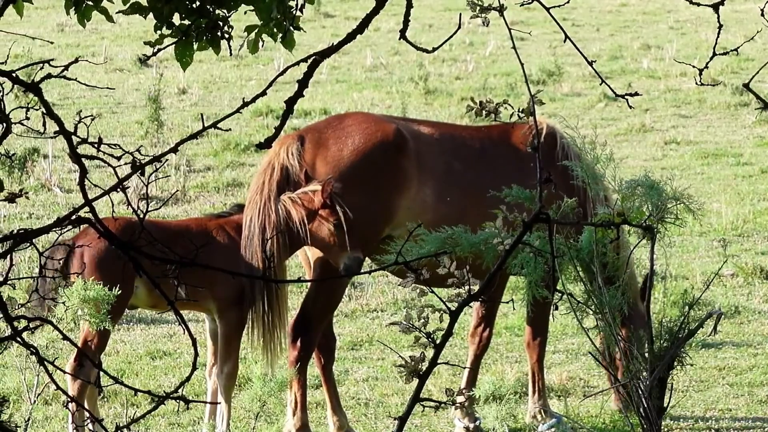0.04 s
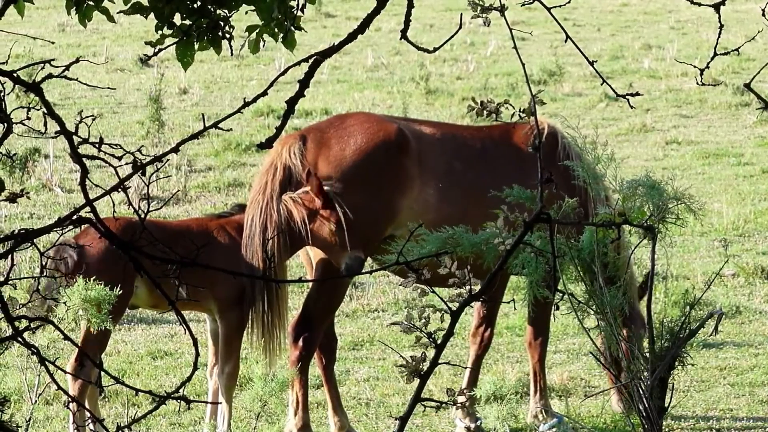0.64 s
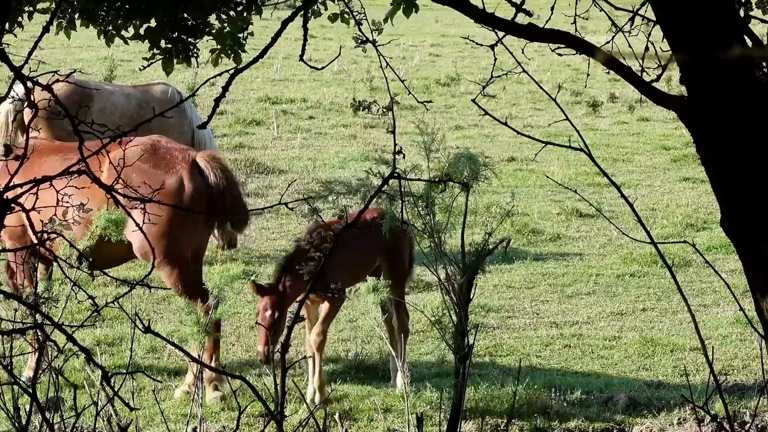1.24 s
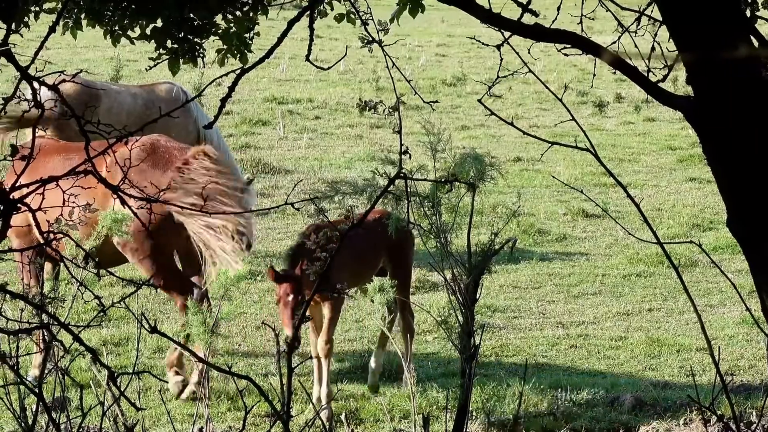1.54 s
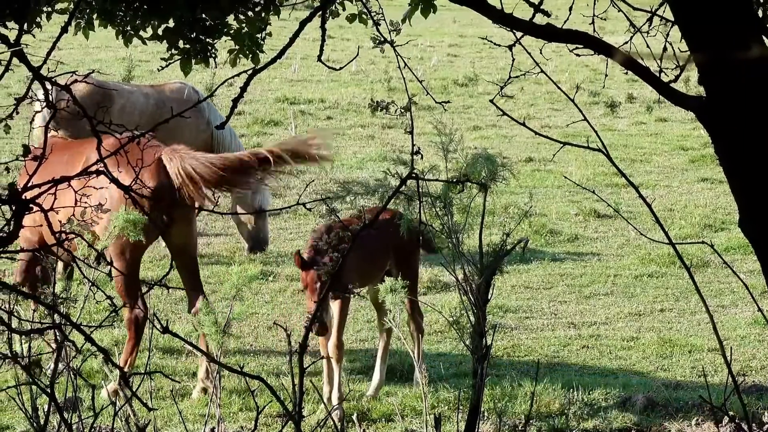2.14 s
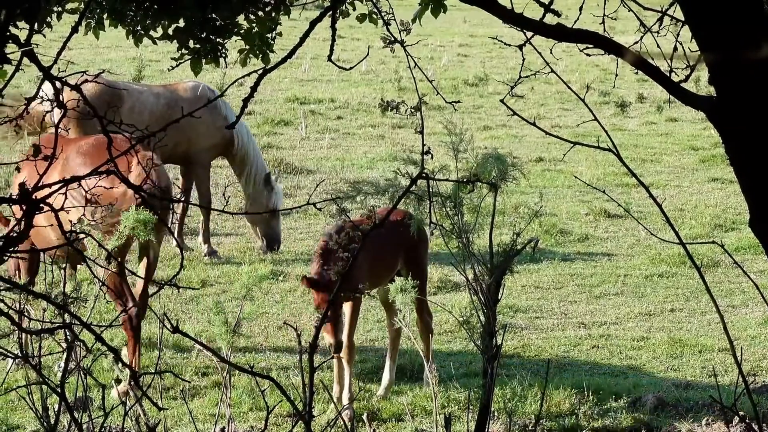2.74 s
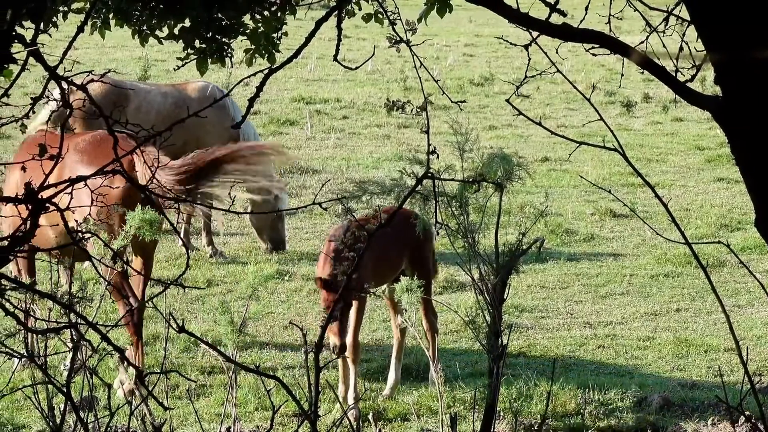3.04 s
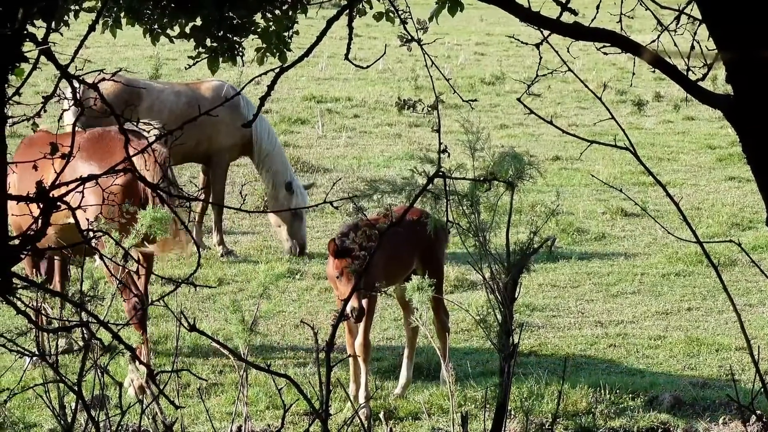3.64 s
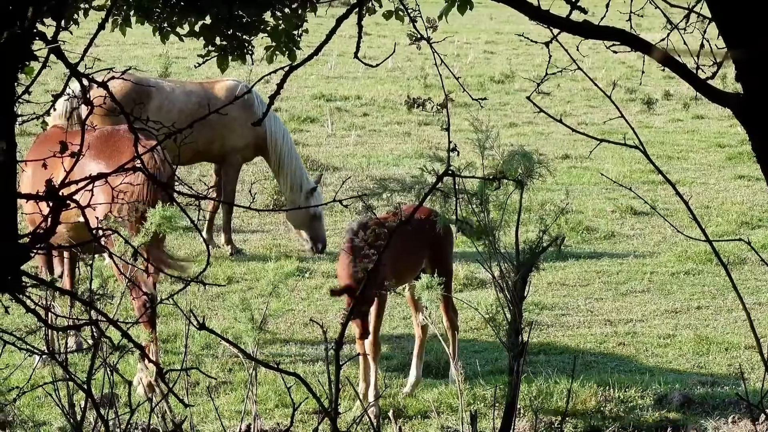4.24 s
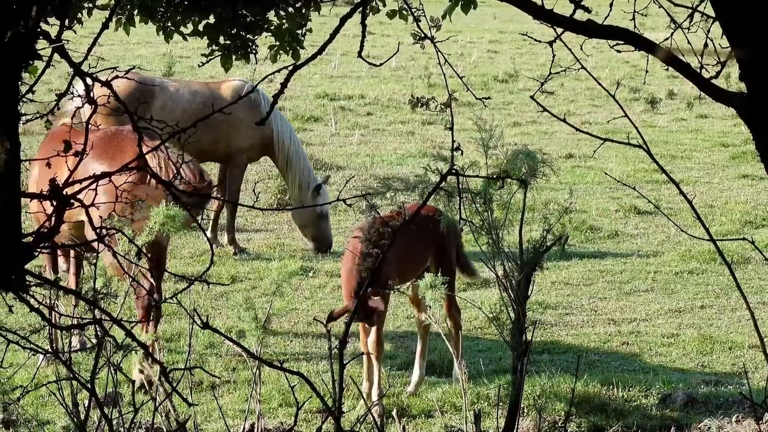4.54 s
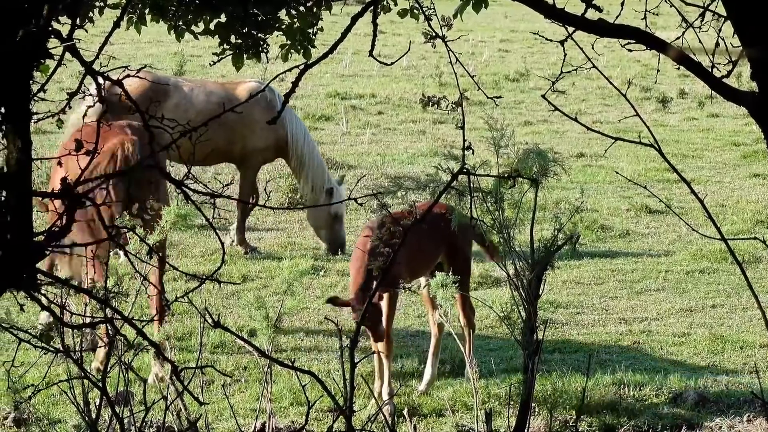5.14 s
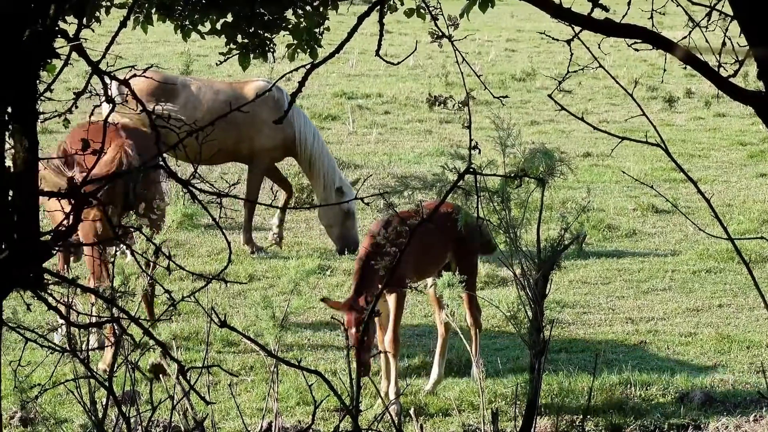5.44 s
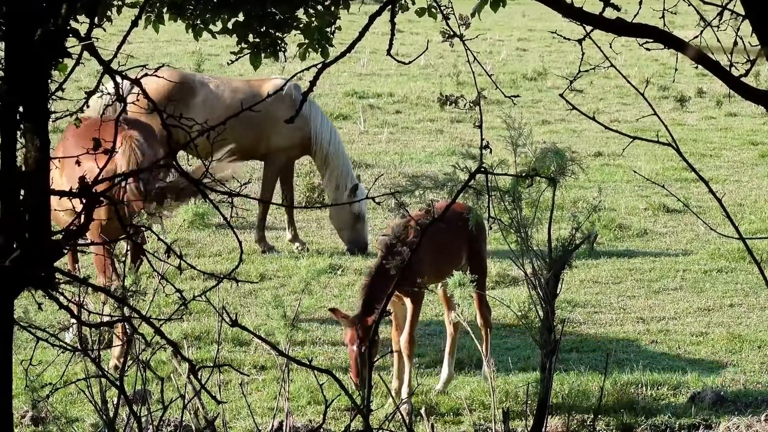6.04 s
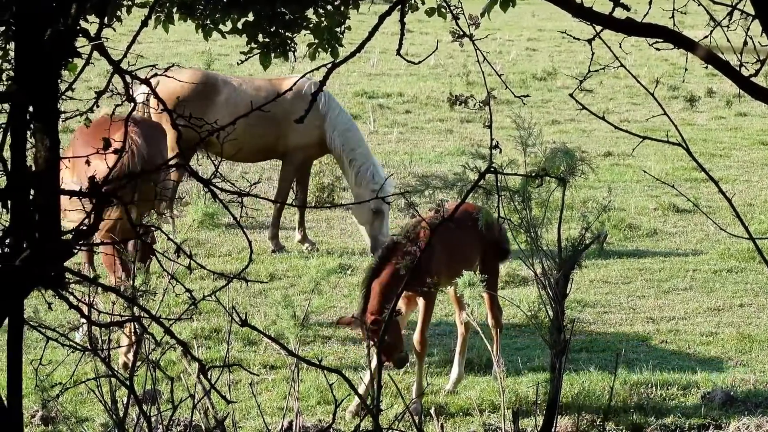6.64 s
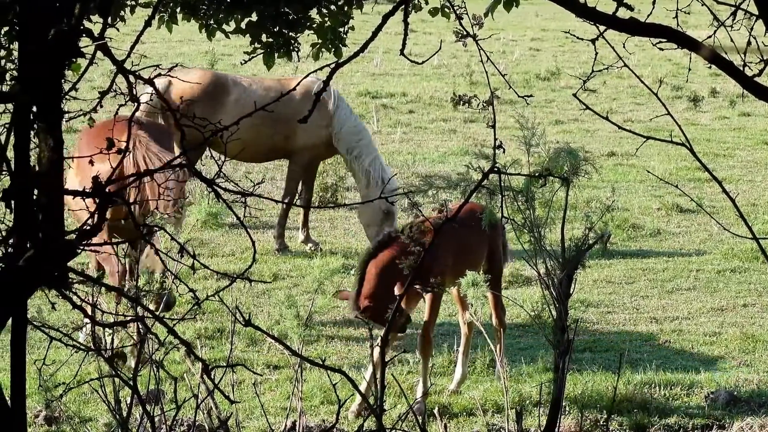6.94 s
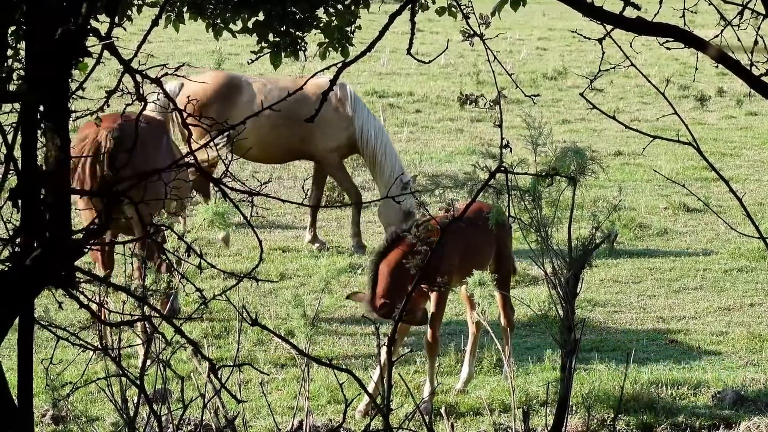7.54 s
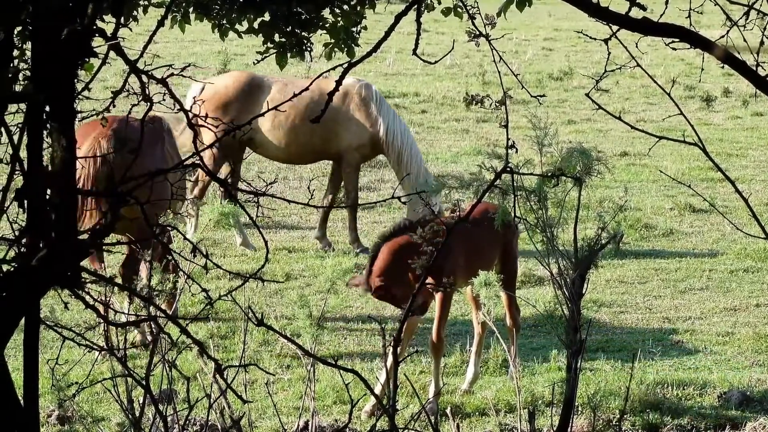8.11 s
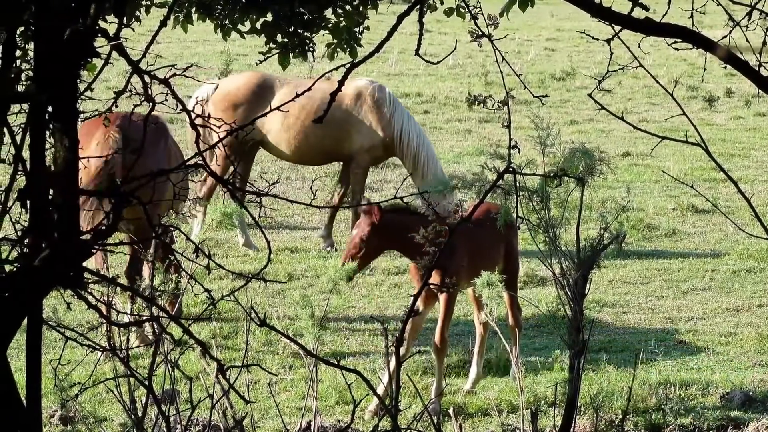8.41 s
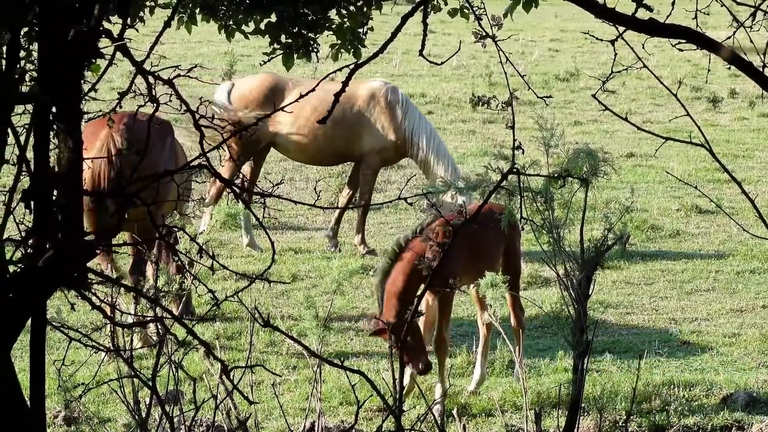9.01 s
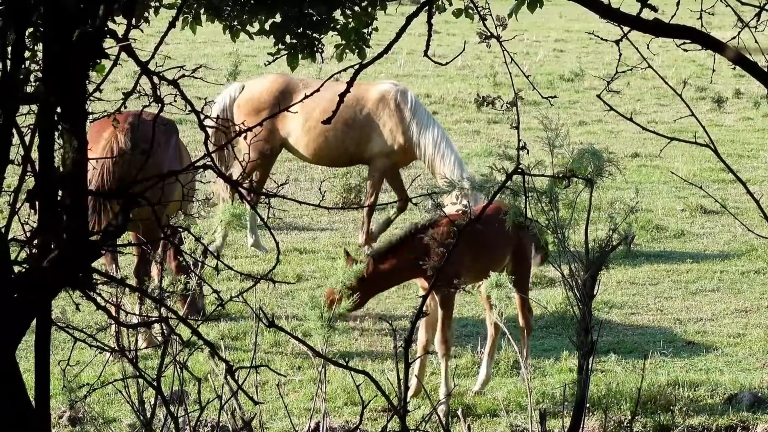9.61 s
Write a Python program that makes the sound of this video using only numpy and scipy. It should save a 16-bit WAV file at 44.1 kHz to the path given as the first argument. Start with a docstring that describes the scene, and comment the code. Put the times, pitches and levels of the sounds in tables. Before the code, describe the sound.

A soft hush of open country runs throughout, heard from under trees beside a meadow. To the left an insect scrapes out four bursts of quick rasping pulses, the last longer and softer. Just as it begins, a dry stick snaps sharply close to the microphone, followed by smaller cracks and a short echo. Grass and leaves rustle now and then, and faraway birds whistle thinly.

```python
"""A meadow, heard from under trees. Open country hushes; grass and leaves rustle now and then. To the left an
insect scrapes its wings in four bouts of about ten rasping strokes a second. A dry stick snaps close by, fibre
after fibre, with smaller cracks around it. Far birds whistle, and a thin ringing near 3 kHz lingers between the
strokes of the first two bouts. A few thin sizzles and dull thuds come and go. Trunks and leaves scatter a short
echo."""
import sys
import numpy as np
from scipy import signal
from scipy.fft import rfft, irfft, next_fast_len
from scipy.io import wavfile
from scipy.ndimage import uniform_filter1d

SR = 44100
rng = np.random.default_rng(int(sys.argv[2]) if len(sys.argv) > 2 else 0)


def transcribe(signal):
    """Save signal, clipped to [-1, 1], as a 16-bit WAV file at the path in sys.argv[1]."""
    frames = np.atleast_2d(signal).T
    limited = np.clip(frames, -1, 1)
    pcm = np.round(limited * 32767).astype(np.int16)
    wavfile.write(sys.argv[1], SR, pcm)


N = 435266


def amp(db):
    return 10 ** (np.asarray(db) / 20)


def unit(x):
    """Scale to rms 1."""
    return x / np.sqrt(np.mean(x ** 2) + 1e-20)


def smooth_noise(count, width_samples):
    """Moving average of white noise, rms 1."""
    return unit(uniform_filter1d(rng.standard_normal(count), width_samples))


def wander(t, slow_hz=0.98, fast_hz=5):
    """Slow random movement, rms 1."""
    rates_hz = np.geomspace(slow_hz, fast_hz, num=24)
    return unit(sum(np.sin(2 * np.pi * (hz * t + rng.random())) for hz in rates_hz))


def drift(curve, t):
    """A (time_s, level_db) curve about its median."""
    db = np.interp(t, *np.transpose(curve))
    return db - np.median(db)


def read(points, hz):
    """Interpolate a table on a log-frequency axis."""
    freq_hz, value = np.transpose(points)
    return np.interp(np.log(hz + 1), np.log(freq_hz + 1), value)


def add(mix, start_s, sound):
    part = mix[max(round(start_s * SR), 0):][:len(sound)]
    part += sound[:len(part)]


def colour(x, spectrum):
    """Filter by a (freq_hz, gain_db) table, keeping the power of white noise."""
    size = next_fast_len(x.shape[-1])
    gain = unit(amp(read(spectrum, np.fft.rfftfreq(size, 1 / SR))))
    return irfft(rfft(x, size) * gain, size)[..., :x.shape[-1]]


def pair(a, b, correlation):
    """Two independent signals to correlated stereo."""
    return np.array([a, correlation * a + np.sqrt(1 - correlation ** 2) * b])


def pan(x, left_db):
    return x * amp([[left_db / 2], [-left_db / 2]])


def trees(x, correlation, rise_s=0.0022, early_s=0.02):
    """Scatter from trunks and leaves: strong early returns, then a diffuse tail."""
    # echo decay: freq_hz, t60_s
    decay = [(300, 0.22), (2000, 1), (4000, 0.67), (8000, 0.55), (15000, 0.43)]
    noise = pair(*rng.standard_normal((2, SR)), correlation)
    hz, t, bins = signal.stft(noise, SR, nperseg=256)
    tail = signal.istft(bins * amp(-60 * t / read(decay, hz)[:, None]), SR, nperseg=256)[1]
    t = np.arange(tail.shape[1]) / SR
    tail *= (1 - np.exp(-t / rise_s)) * (1 + np.exp(-t / early_s))
    return signal.fftconvolve(x[None], tail / np.linalg.norm(tail[0]), axes=1)[:, :N]


def air(level_db=-49.5, patchy_db=2.0, rumble_depth=0.9, rumble_swell_db=1.0, hiss_swell_db=0.3):
    """Hush of open country: a low rumble common to both sides and a wide, drifting hiss."""
    # noise density: freq_hz, relative_db
    spectrum = [(20, -34), (35, -39), (58, -16.5), (85, -2.5), (125, -1), (250, -7), (500, -8), (900, -9.5),
                (1800, -9), (2500, -16), (6000, -22), (10000, -29.5), (15500, -31.5)]
    # spectral humps and dips: centre_hz, width_hz, gain_db
    humps = [(526, 180, -2.5), (618, 88, 4.5), (860, 170, -2), (1203, 130, 3.5), (1376, 140, -2),
             (1820, 1100, 1.5), (2260, 240, -4.5)]
    # left-right likeness: freq_hz, correlation
    likeness = [(60, 0.88), (130, 0.94), (290, 0.19), (640, 0.14), (1400, 0.0186), (3100, 0.057),
                (6800, 0.17), (15000, 0.6)]
    # part of each band that swells with the rumble: freq_hz, share
    rumble_reach = [(150, 0.53), (400, 0.024)]
    # rumble contour, scaled by rumble_depth: time_s, relative_db
    rumble_curve = [(0.0, -63), (1.35, -57.5), (1.67, -58), (1.76, -47), (1.84, -56), (2.33, -52.5),
                    (3.21, -67.5), (3.32, -57), (7.2, -59), (7.39, -65.5), (8.0, -56), (8.33, -63.5),
                    (8.49, -57.5), (9.87, -61.5)]
    # hiss contour: time_s, relative_db
    hiss_curve = [(0, -56), (1.3, -55.5), (3.2, -56.5), (5.8, -55.5), (7.1, -57), (9.45, -56.5),
                  (9.75, -53.5)]
    t = np.arange(N // 512 + 5)[:, None] * 512 / SR
    hz = np.fft.rfftfreq(2048, 1 / SR)
    re_a, im_a, re_b, im_b, patches = rng.standard_normal((len(t), len(hz), 5)).transpose(2, 0, 1)
    patches = unit(uniform_filter1d(uniform_filter1d(patches, size=8, axis=0), size=7, axis=1))
    humps_db = sum(db * np.exp(-(2 * (hz - centre) / width) ** 2) for centre, width, db in humps)
    rumble_db = rumble_depth * drift(rumble_curve, t) + rumble_swell_db * wander(t)
    hiss_db = drift(hiss_curve, t) + hiss_swell_db * wander(t)
    share = read(rumble_reach, hz)
    swell_db = share * rumble_db + (1 - share) * hiss_db
    bins = pair(re_a + 1j * im_a, re_b + 1j * im_b, read(likeness, hz))
    bins *= amp(read(spectrum, hz) + humps_db + swell_db + patchy_db * patches)
    hush = signal.istft(bins.swapaxes(1, 2), nperseg=2048, noverlap=1536)[1][:, :N]
    return amp(level_db) * pan(unit(hush), left_db=0.5)


def rustle(ticks_per_s=4500, spread_db=1.0, clump_db=2.5, stir_db=-68, stir_spread_db=3, echo_db=-6):
    """Blades and leaves brush each other: clumped clouds of tiny, uneven ticks over a faint stir."""
    # rustles: peak_s, level_db, rise_s, decay_s
    swells = [(.11, -52, 0.05, 0.14), (.475, -48.5, .008, .11), (1.11, -41.5, 0.067, 0.061),
              (1.575, -41, 0.029, 0.11), (2.549, -45, 0.036, 0.11), (2.85, -50.5, 0.091, 0.06),
              (3.64, -52, 0.033, 0.047), (4.24, -57, .05, .05), (5.44, -50.5, 0.12, 0.13),
              (5.77, -46.5, 0.047, 0.082), (6.497, -50, 0.019, 0.027), (6.657, -53, 0.031, .042),
              (7.595, -41, 0.035, 0.058), (7.895, -47, .012, 0.099), (9.21, -53, .034, 0.032),
              (9.68, -53.5, 0.03, 0.024)]
    # leaf tick spectrum: freq_hz, gain_db
    spectrum = [(500, -34), (1500, -6.5), (3000, 0), (6000, -0.5), (8000, -2.5), (10500, -6.5),
                (13500, -13), (15500, -12.5)]
    t = np.arange(0, N / SR, 0.002)
    power = amp(2 * (stir_db + stir_spread_db * wander(t)))
    for peak_s, db, rise_s, decay_s in swells:
        falloff = np.where(t < peak_s, (peak_s - t) / rise_s, (t - peak_s) / decay_s)
        power += amp(2 * db) * np.exp(-2 * falloff)
    clumps = unit(amp(clump_db * smooth_noise(len(t), 7)))
    motion = np.interp(np.arange(N) / SR, t, np.sqrt(power) * clumps)
    sizes = amp(spread_db * np.minimum(rng.exponential(1, (2, N)), 4))
    hits = rng.random((2, N)) < ticks_per_s / SR
    ticks = colour(unit(sizes * hits * rng.standard_normal((2, N))) * motion, spectrum)
    return pair(*ticks, correlation=0.48) + amp(echo_db) * trees(ticks[0], correlation=0.52)


def sizzles(echo_db=-7):
    """Brief narrow hisses at the top of hearing."""
    # sizzles: start_s, length_s, level_db
    bursts = [(0.418, 0.15, -60), (2.533, 0.042, -54), (5.753, 0.044, -43), (7.53, 0.12, -48)]
    # sizzle band: freq_hz, gain_db
    spectrum = [(8000, -60), (14600, -35), (15300, -1), (15600, 0), (15900, -7), (17000, -30)]
    hiss = np.zeros(N)
    for start_s, length_s, db in bursts:
        swell = np.hanning(int(length_s * SR))
        add(hiss, start_s, amp(db) * unit(swell * rng.standard_normal(len(swell))))
    hiss = colour(hiss, spectrum)
    return hiss + amp(echo_db) * trees(hiss, correlation=0.6)


def fractures(breaks, ring_s, splinter_s, rise_s=0.00043, waver=0.17, slope_db_per_octave=7.5):
    """Each break rings the wood briefly and throws a spray of noise, strongest near that ring."""
    # splintering spectrum: freq_hz, gain_db
    splinter = [(300, -42), (1300, -15), (2000, -33), (3500, -4.5), (6000, -8), (9000, -5.5), (12000, -7.5),
                (15500, -12.5)]
    t, cracks = np.arange(2048) / SR, np.zeros(N)
    for start_s, db, ring_hz, splinter_db in breaks:
        warp_s = waver * np.cumsum(smooth_noise(len(t), 12)) / SR
        ring = np.sin(2 * np.pi * ring_hz * (t + warp_s)) * np.exp(-t / ring_s)
        spectrum = [(hz, gain_db - slope_db_per_octave * abs(np.log2(hz / ring_hz)))
                    for hz, gain_db in splinter]
        spray = unit(colour(rng.standard_normal(len(t)), spectrum)) * np.exp(-t / splinter_s)
        attack = 1 - np.exp(-t / rise_s)
        add(cracks, start_s, amp(db) * (ring + amp(splinter_db) * spray / np.sqrt(2)) * attack)
    return cracks


def twigs(gain_db=3, echo_db=-3):
    """Small cracks of dry wood, slightly to the right."""
    # cracks: start_s, relative_db, ring_hz, splinter_db
    cracks = [(.464, -40, 3510, 1), (1.047, -32.5, 3800, -4.5), (1.1255, -22.5, 3530, 4.5),
              (1.2895, -18.5, 3300, -6), (1.3712, -16, 6660, -4), (1.4342, -19.5, 4890, -5),
              (1.553, -33.5, 8520, -4), (1.580, -23, 3840, -27), (1.588, -28.5, 4600, -16),
              (1.612, -30, 4170, -19), (1.6757, -27.5, 3830, -21), (2.546, -38.5, 5600, 3.5),
              (5.539, -41.5, 5200, 0.5), (5.761, -40, 6900, -5), (5.767, -36, 6350, -7),
              (6.488, -46, 5960, 4), (7.535, -46, 6100, 4), (7.574, -38, 6000, 2), (7.603, -32.5, 6370, -2),
              (7.6686, -41, 4180, 7), (7.932, -45, 4600, 3), (7.974, -44, 4580, -3)]
    direct = amp(gain_db) * fractures(cracks, ring_s=0.0028, splinter_s=0.004)
    return pan(direct + amp(echo_db) * trees(direct, correlation=0.27), left_db=-6.0)


def strokes(first_gap_s=0.067, sway_depth=0.087, sway_period_s=0.584,
            warm_up_db=-3.5, warm_up_strokes=0.99, tire_db=-2, tire_s=0.2, uneven_db=0.13):
    """Yield (time_s, level_db, softness) per wing stroke; bouts start quick and weak, settle, ease off."""
    # trill bouts: start_s, end_s, gap_growth_s per stroke, settled_gap_s, relative_db, softness (0-1)
    bouts = [(1.034, 2.286, 0.042, .104, -39, 0.26), (2.645, 3.024, 0.0093, .108, -41, 0.1),
             (4.966, 5.79, .0044, .104, -42.8, 0.06), (6.851, 9.42, 0.0044, .1028, -46.5, 0.9)]
    for start_s, end_s, gap_growth_s, settled_gap_s, db, softness in bouts:
        time_s, count = start_s, 0
        while time_s < end_s:
            effort_db = warm_up_db * np.exp(-count / warm_up_strokes)
            effort_db += tire_db * np.exp((time_s - end_s) / tire_s)
            yield time_s, db + effort_db - uneven_db * rng.standard_normal(), softness
            sway = 1 + sway_depth * np.cos(2 * np.pi * (time_s - start_s) / sway_period_s)
            time_s += min(first_gap_s + gap_growth_s * count, settled_gap_s * sway)
            count += 1


def insect(swell_s=0.012, fade_s=0.018, teeth_hz=330, jitter=0.3,
           wing_hz=2460, wing_q=5, wing_db=-8, direct_db=-3.5, echo_db=-8.5):
    """Each wing stroke swells and fades while a scraper trips unevenly over the teeth of a file."""
    # rasp of the near bouts: freq_hz, gain_db
    near_rasp = [(1000, -52), (1500, -10), (1900, -8), (2200, -1.5), (2500, 0), (2930, -1), (3150, -12),
                 (3700, -24), (5500, -20), (9000, -35)]
    # rasp of the last, softer bout: freq_hz, gain_db
    soft_rasp = [(1000, -37), (1350, -12), (1600, -5), (2200, -2.5), (2500, -3.5), (2900, -3),
                 (3150, -15.5), (3600, -8.5), (4400, -23), (9000, -48)]
    t = np.arange(-2700, 2700) / SR
    pressure = np.exp(-0.5 * (t / np.where(t < 0, swell_s, fade_s)) ** 2)
    rasp = np.zeros(N)
    for peak_s, db, softness in strokes():
        rate_hz = teeth_hz * (1 + jitter * smooth_noise(len(t), 150))
        tooth_phase = np.cumsum(rate_hz) / SR % 1
        teeth = unit(np.exp(-tooth_phase) * rng.standard_normal(len(t)))
        scrape = (1 - softness) * colour(teeth, near_rasp) + softness * colour(teeth, soft_rasp)
        ring_hz = wing_hz * (1 + 0.055 * rng.standard_normal())
        # the wing rings most at full pressure
        ring = unit(signal.lfilter(*signal.iirpeak(ring_hz, wing_q, fs=SR), teeth)) * pressure
        add(rasp, peak_s + t[0], amp(db) * pressure * (scrape + amp(wing_db) * ring))
    direct = pan(np.array([np.roll(rasp, 1), rasp]), left_db=6.5)  # sides one sample apart
    return amp(direct_db) * direct + amp(echo_db) * trees(rasp, correlation=0.15)


def snap(push_db=-11, push_s=0.00026, tail_db=15, ring_db=-27, ring_rise_s=0.0024, spread_cycles=0.21):
    """The stick breaks with a push of air; a bright ringing tail follows."""
    # fibres giving way in turn: start_s, level_db, ring_hz, splinter_db
    fibres = [(1.1791, -21, 5650, 4), (1.1815, -7, 3314, 4), (1.1834, -3, 3547, 1),
              (1.1847, -12, 3580, -3.5)]
    # modes that ring on: pitch_hz, relative_db, t60_s
    modes = [(3020, -3, .2), (3170, -6, .4), (3395, 0, .4), (3800, -3.5, 0.32), (4450, 7, 0.39),
             (4580, -21, 0.26), (4600, -13, .25), (5482, 7, 0.2), (5900, 1, .3), (5945, 0, 0.37),
             (6503, -13, .33), (6400, 0.5, 0.25), (8340, 3, .25), (9150, 1, .25), (10000, -4, .3)]
    # scattered tail: freq_hz, gain_db
    tail_spectrum = [(300, -32), (1300, -24), (1900, -6.5), (2800, -8.5), (4000, -3), (6000, -1),
                     (9000, -3.5), (12000, -6), (15500, -16)]
    t, start_s = np.arange(SR) / SR, fibres[1][0]
    direct = fractures(fibres, ring_s=0.0021, splinter_s=0.0046)
    add(direct, start_s, amp(push_db) * (1 - t / push_s) * np.exp(-t / push_s))
    impulse, ring = np.zeros(N), np.zeros((2, N))
    add(impulse, start_s + 0.005, amp([tail_db]))
    for hz, db, t60_s in modes:
        envelope = amp(ring_db + db - 60 * t / t60_s) * (1 - np.exp(-t / ring_rise_s))
        phases = rng.random() + spread_cycles * rng.standard_normal(2)  # sides slightly out of step
        for side, phase in zip(ring, phases):
            add(side, start_s, envelope * np.sin(2 * np.pi * (hz * t + phase)))
    tail = colour(trees(impulse, correlation=0.5), tail_spectrum)
    return pan(direct, left_db=-4) + pan(ring + tail, left_db=-1.5)


def whistles(skew=0.63, direct_db=-1, echo_db=-3):
    """Thin gliding tones blurred by distance: first a thin ringing near 3 kHz that lingers between the strokes
    of the first two bouts, then far birds whistling, some pure and some buzzy."""
    # notes: start_s, length_s, start_hz, end_hz, relative_db, flutter_hz; the first two ring thinly near 3 kHz
    # between strokes, the rest are bird notes
    notes = [(1.482, 0.82, 3270, 3224, -57.5, 153), (2.583, 0.29, 2750, 3130, -56, 154),
             (3.43, 0.085, 590, 620, -59, 9.1), (4.58, 0.45, 2630, 2730, -70, 35),
             (5.889, .13, 4240, 4166, -46.5, 52), (5.99, 0.22, 4180, 4020, -57, 60),
             (6.15, .12, 4020, 2990, -54, 170), (6.641, 0.06, 9930, 9670, -56, 170),
             (6.655, .42, 7480, 7300, -67.5, 135), (7.241, 0.05, 4320, 4870, -62, 50),
             (7.358, .03, 4200, 4500, -62, 150), (8.151, 0.14, 4630, 4634, -55.5, 63),
             (8.565, 0.49, 4450, 4000, -62, 440), (9.468, 0.058, 4700, 3700, -60.5, 350)]
    song = np.zeros(N)
    for start_s, length_s, start_hz, end_hz, db, flutter_hz in notes:
        progress = np.linspace(0, 1, int(length_s * SR))
        hz = start_hz + (end_hz - start_hz) * progress + flutter_hz * smooth_noise(len(progress), 70)
        envelope = np.sin(np.pi * progress ** skew)  # skew < 1 peaks early
        add(song, start_s, amp(db) * unit(envelope * np.sin(2 * np.pi * np.cumsum(hz) / SR)))
    return amp(direct_db) * song + amp(echo_db) * trees(song, correlation=0.18)


def thuds():
    """Soft low knocks of only a few cycles."""
    # thuds: centre_s, level_db, pitch_hz, half_length_s
    pulses = [(1.757, -40.5, 96, 0.0091), (1.754, -51.5, 228, 0.017), (2.809, -44, 310, 0.0049),
              (6.635, -33, 224, 0.0023)]
    t, knocks = np.arange(-SR // 10, SR // 10) / SR, np.zeros(N)
    for centre_s, db, hz, half_length_s in pulses:
        envelope = amp(db) * np.exp(-0.5 * (t / half_length_s) ** 2)
        add(knocks, centre_s + t[0], envelope * np.sin(2 * np.pi * hz * t))
    return knocks


def scene():
    return air() + insect() + snap() + twigs() + rustle() + whistles() + sizzles() + thuds()


def record(dry, cutoff_hz=15900):
    """Clip at full scale, then low-pass."""
    lowpass = signal.firwin(511, cutoff_hz, window=("kaiser", 9), fs=SR)
    return signal.oaconvolve(np.clip(dry, -1, 1), lowpass[None], "same")


dry = scene()
out = record(dry)
transcribe(out)
```